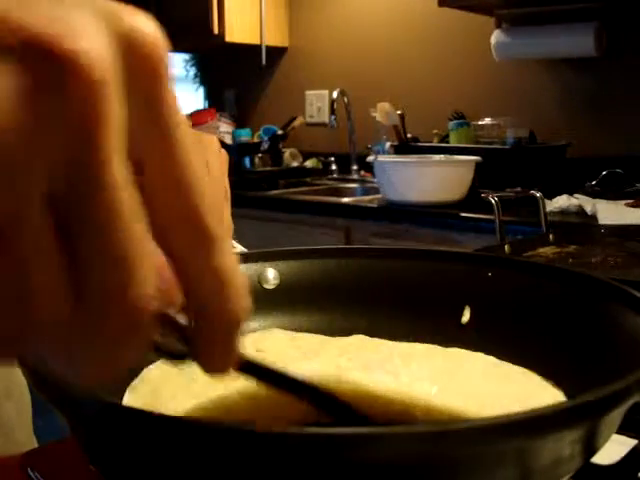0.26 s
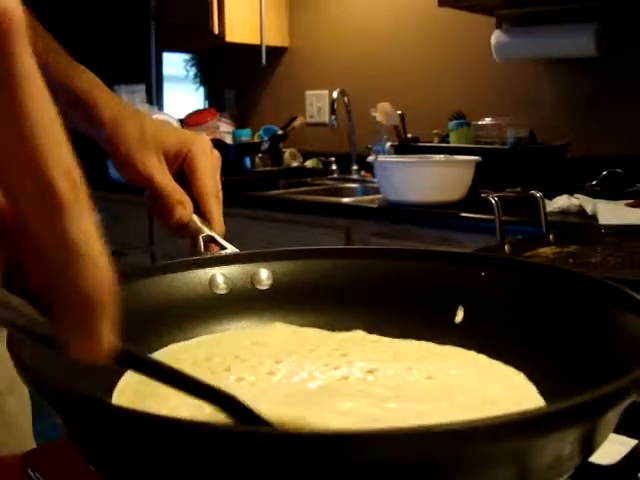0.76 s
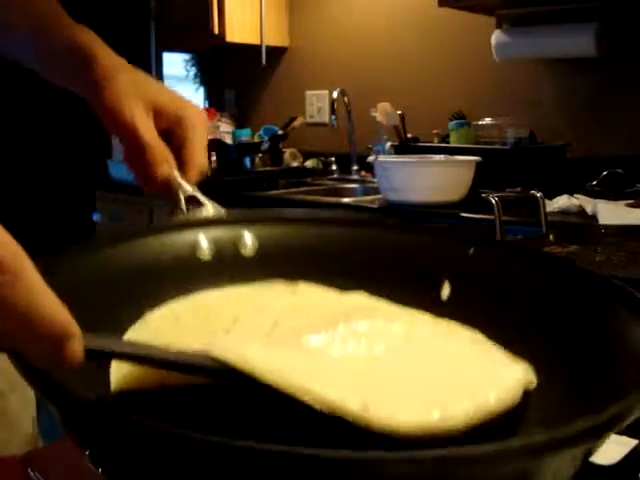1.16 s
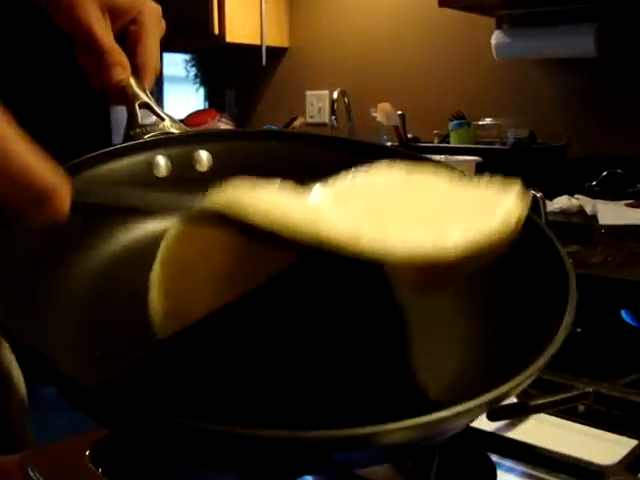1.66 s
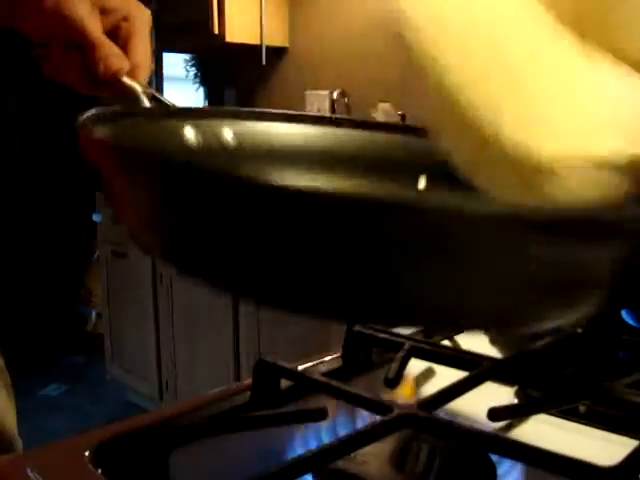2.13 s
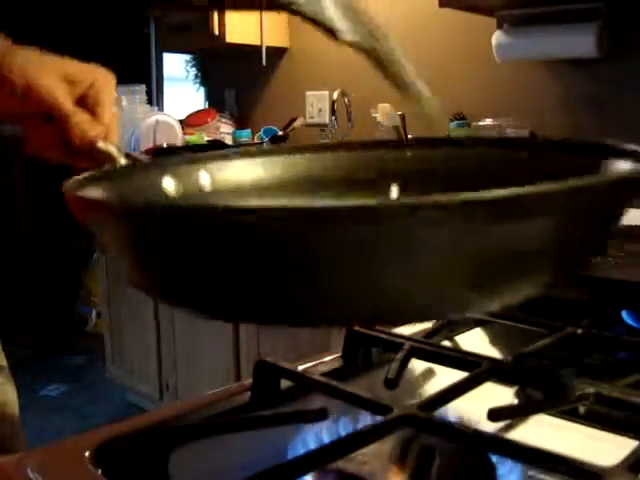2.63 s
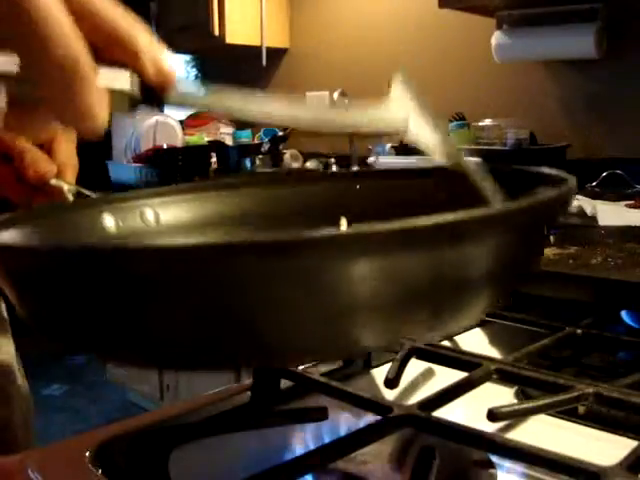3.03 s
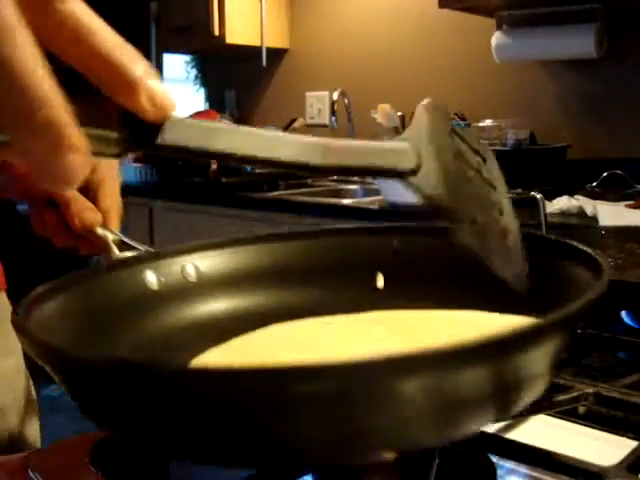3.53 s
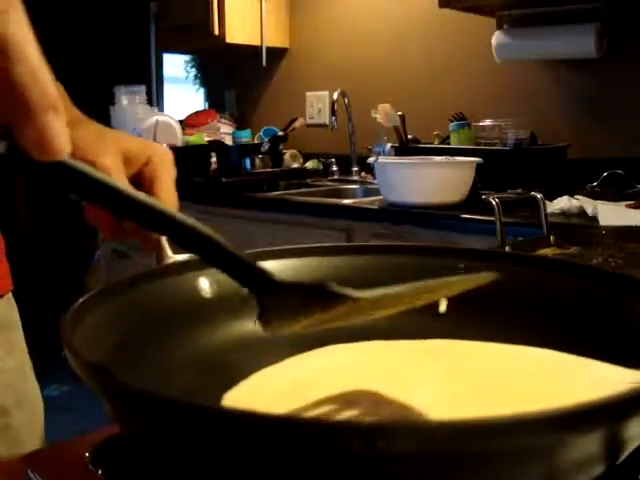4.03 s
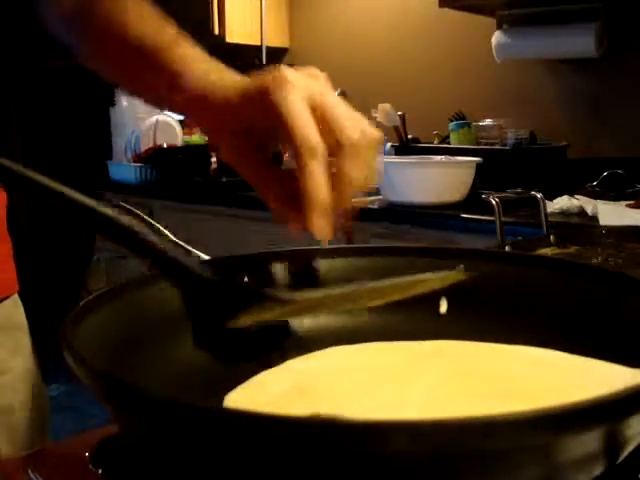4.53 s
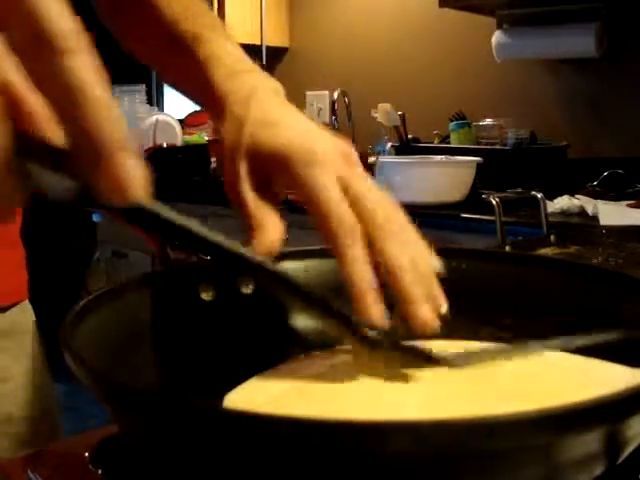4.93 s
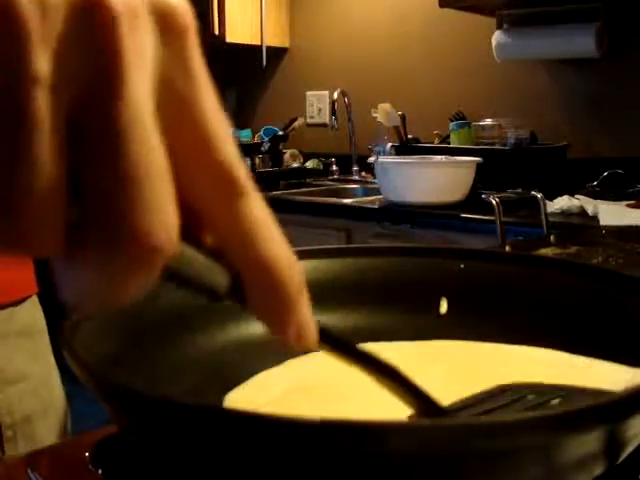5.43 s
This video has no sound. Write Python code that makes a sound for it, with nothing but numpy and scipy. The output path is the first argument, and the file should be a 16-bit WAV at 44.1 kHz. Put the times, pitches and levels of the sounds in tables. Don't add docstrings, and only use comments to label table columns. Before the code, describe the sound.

A steady, broad hiss of gas flame and extractor fan runs throughout, with faint low thumps from the camera's electrics. From 0 to 1.1 s a plastic spatula makes quiet scuffs, small knocks and faint pings under a pancake, ending in a firmer scrape. At about 1.2 s the pan rocks, then drags off its iron grate until 1.7 s, with a wavering mid-pitched metallic groan and hard knocks near 1.57 s that leave a brief ring. The uncovered burner hisses slightly more around 2 to 3 s. The soft pancake slaps flat at 2.35 s; the rim gets a light tap at 3.01 s. At 3.72 s the pan lands with a loud clank, slides and rattles, bounces at 4.03 s and settles by 4.3 s. Then mostly hiss, with a small spatula tick and rub at 5.35 s. Short echoes, limited treble and clipped blows.

```python
import sys
import numpy as np
from scipy import signal
from scipy.io import wavfile
from scipy.ndimage import uniform_filter1d

SR = 44100
rng = np.random.default_rng(int(sys.argv[2]) if len(sys.argv) > 2 else 0)


def gain_from_db(level_db):
    decades = np.asarray(level_db, float) / 20
    return 10 ** decades


def transcribe(u):
    v = np.clip(np.atleast_2d(u).T, -1, 1)
    q = np.round(v * 32767).astype(np.int16)
    wavfile.write(sys.argv[1], SR, q)


N = 250485

# (frequency [Hz], level [dB])
HISS_COLOUR = [(40, -22.5), (100, -16), (200, -31.5), (350, -13), (600, -2), (1000, -13), (1800, -16),
               (2700, -11), (3300, -17.5), (6000, -23.5), (9800, -28), (11000, -26.5)]
# (frequency [Hz], width [Hz], level [dB])
HISS_BANDS = [(244.2, 21.3, 14.0), (455, 80, 1.5), (1616, 44, -8.5), (2880, 85, -6.5), (3950, 140, -9),
              (4290, 46, -11.5), (8500, 90, -22), (138, 59, 2.0), (670, 32, -22.0)]
# (time [s], level [dB])
HISS_SWELL = [
    (0, 0.5),
    (1, 0.5),
    (2.099, 0),
    (2.8, 1),
    (3.499, 0),
    (4.6, 0),
    (5.68, 0),
]
# (time [s], level [dB])
JETS_OPEN = [
    (0, -4.5),
    (1.7, -3),
    (2.2, 3.5),
    (2.8, 4.5),
    (3.15, -3.5),
    (4.5, -7.5),
    (5.68, -8.5),
]
# (frequency [Hz], time to fall 60 dB [s])
KITCHEN_FADE = [(120, 0.86), (330, 0.53), (870, 0.32), (2300, 0.38), (6060, 0.31)]
JOLTS = [.07, .805, 1.595, 2.6, 3.072, 3.972, 4.872, 5.5]
SMALL_JOLTS = [.765, 2.565, 5.462]
# (time [s], length [s], lowest frequency lost [Hz])
DROPOUTS = [(0.41, 0.003, 4950), (0.494, 0.0032, 4700), (0.553, 0.0038, 4430), (1.031, 0.0087, 3200),
            (1.245, 0.021, 4400), (1.924, 0.011, 4000), (2.028, 0.009, 5300), (2.294, 0.0084, 5450),
            (2.329, 0.021, 3200), (2.336, 0.0033, 1002), (2.388, 0.01, 7000), (3.055, 0.02, 5100),
            (5.365, .012, 5200), (3.693, 0.025, 900), (3.752, 0.007, 4900), (3.758, 0.009, 4700),
            (3.811, 0.0071, 5100), (3.974, 0.0063, 5960), (3.849, 0.0072, 5960), (4.022, .006, 4000),
            (4.041, 0.016, 6600), (4.193, 0.01, 3500), (4.259, 0.015, 5400)]

# (frequency [Hz], level [dB])
SPATULA = [(785, 33, 6.5), (3100, 280, -2), (3500, 63, -2), (3690, 60, 0.5), (4560, 19, -20),
           (5440, 110, -26), (7000, 22, -28), (7750, 83, -16)]
SPATULA_DENSE = [(59, -23), (100, -23.5), (139, 7), (329, -28), (781, 3), (2720, -13.5), (5640, -6),
                 (9850, -13.5), (12800, -50), (21700, -120)]
BATTER = [(666, 30, 7), (1130, 230, -3), (1990, 230, -10), (3610, 800, -3.5), (6380, 320, -9),
          (8400, 470, -15.5)]
BATTER_DENSE = [(60, -46), (240, -14.5), (700, -1.5), (1200, -7), (2200, -15), (3600, -8), (9600, -12),
                (12000, -10)]
GRATE = [(157, 30, -9), (243, 17.5, -1), (368, 17, -13), (460, 7.6, -3.5), (647, 24, 5), (792, 51, 1.5),
         (1350, 96, -7.5), (1620, 42, -7), (2010, 210, -15), (2500, 160, -27), (3040, 320, -20),
         (4270, 2900, -35.5)]
GRATE_DENSE = [(60, -71), (200, -16.5), (600, -1.5), (1400, -13), (2700, -42.5), (5500, -33.5),
               (9600, -46.5), (12000, -76.5)]
PAN_LOW = [(150, 15, -5), (668, 22, 27.5), (890, 20, -4), (930, 39, 11)]
PAN_DENSE = [(60, -69), (200, -34), (500, -5.5), (1200, -2.5), (2700, -24), (5000, -18), (9600, -27),
             (12000, -41.5)]
# (frequency [Hz], width [Hz], level [dB])
RIM = [(515, 60, 0), (1160, 60, -8), (1637, 40, -8), (3000, 90, -24)]
EDGE = [(1500, 300, -12), (250, 30, -2), (3950, 25, -7), (2550, 25, -1), (2000, 200, -12), (3100, 40, -5)]
# (width [Hz], level [dB])
PAN_HZ = [1272, 1650, 2003, 2391, 2990, 3310, 3330, 3740, 4180, 4335, 4655, 4985, 5640, 5810, 5845, 6760,
          7250, 7600, 7745, 8000, 8657, 9700]
PAN_RING = [(14, -22), (40, 0.5), (15.9, -2), (16, -9.5), (22, 0.5), (28, 2.5), (20.4, -9), (35, -12),
            (40, -8), (25, -13), (26, 0), (35, -18), (60, -6.5), (25, -3.5), (25, -7.5), (60, -10.5),
            (35, -16), (30, -20), (20, -12.5), (60, -14), (20, -23), (50, -18)]
# (frequency [Hz], width [Hz], level [dB])
GRIPS = [
    [(3030, 58, -15), (1623, 42, 0.5)],
    [(3050, 66, -4), (2480, 110, -4)],
    [(3410, 81, -11.5), (5570, 95, -16)],
    [(3310, 140, -32), (5580, 160, -23)],
    [(3500, 680, 0), (5300, 270, -31)],
]

# (time [s], length [s], peak pressure [dB], sliding speed as middle band over low ring [dB],
# place of the peak [0-1])
NUDGES = [
    (0.024, 0.35, -36.5, -8.5, 0.32),
    (0.384, 0.044, -33.5, -11.5, 0.18),
    (0.469, 0.19, -36, -11.5, 0.4),
    (0.632, 0.15, -37.5, -6, 0.19),
    (0.698, 0.046, -34.5, -16, 0.2),
    (0.78, 0.12, -36.5, -9.5, 0.32),
    (0.9, 0.38, -44.5, -7, 0.06),
]
SCRAPE = [
    (1.025, 0.12, -28.5, -5, 0.37),
    (1.131, 0.08, -24.5, -14.5, 0.57),
]
FLIP = [
    (1.741, 0.15, -37.5, -10, 0.087),
    (1.839, 0.078, -48.5, 7, 0.97),
    (2.17, 0.12, -42.5, -2.5, 0.97),
    (2.285, 0.045, -35, -2.5, 0.81),
    (2.385, 0.099, -37, 2, 0.13),
    (3.05, 0.12, -48, 2.5, 0.1),
    (3.16, 0.037, -40.5, -4.5, 0.18),
    (5.352, 0.06, -39, -9, 0.1),
    (5.44, 0.091, -40.5, -7, 0.59),
]
SETTLE = [
    (3.735, 0.17, -14, -16, 0.16),
    (3.81, 0.13, -15, -12, 0.12),
    (3.88, 0.26, -20.5, -6.5, 0.022),
    (4.035, 0.19, -16, -13.5, 0.071),
    (4.215, 0.14, -18.5, -32, 0.3),
]
# (time [s], pressure [dB], sliding speed [dB])
DRAG = [
    (1.255, -26, -15),
    (1.287, -19, -6),
    (1.309, -18, -8),
    (1.36, -19, -3.5),
    (1.44, -19, 0),
    (1.487, -18.5, -0.5),
    (1.575, -12, -8.5),
    (1.62, -18, -4),
    (1.694, -21.5, -12),
    (1.74, -40, -16),
]
# (time [s], frequency [Hz], level [dB])
BOWED = [
    (1.262, 668, -41),
    (1.312, 668, -20),
    (1.385, 665.2, -22.5),
    (1.43, 678, -22.5),
    (1.49, 682, -30),
    (1.52, 671.4, -17),
    (1.575, 667.5, -13),
    (1.69, 676, -19),
    (1.715, 676, -38),
]

# (time [s], peak level [dB], treble against low ring [dB], chatter time [s],
# mode nearest the blow [Hz])
KNOCKS = [
    (0.389, -28, -6, 0.006, 1335),
    (0.421, -30, -31, 0.049, 1350),
    (0.708, -26.5, -21, 0.0056, 1254),
    (1.231, -14.5, -24.5, 0.0088, 1165),
    (1.566, -4, -8.5, 0.039, 1660),
    (1.599, -8.5, -22, 0.0071, 2000),
]
PINGS = [
    (0.511, -35, -21, 0.0087, 1370),
    (0.647, -37, -13, 0.011, 2070),
    (1.058, -33.5, -19, 0.011, 1110),
    (1.14, -24, -25, 0.018, 1940),
]
ROCKS = [
    (1.168, -14.5, -16, 0.01, 645),
    (1.197, -23, -16, 0.02, 668),
    (1.232, -21, -20, .012, 681),
]
SCRATCH = [
    (.523, -41, 0, .015, 4900),
    (.529, -40, 0, .015, 4400),
    (.527, -43, 0, .015, 5250),
    (3.075, -45, 10, .02, 5300),
]
SLAPS = [
    (2.346, -22.5, -8, 0.05, 705),
    (2.349, -4.5, -7, 0.1, 1109),
    (2.3665, -16, 9, 0.075, 3450),
    (2.372, -13.5, 4, 0.036, 1960),
]
RIM_TAP = [
    (3.0135, -19.5, -17, 0.006, 560),
]
EDGE_TAP = [
    (5.35, -27, -2, .004, 1645),
]
LANDINGS = [
    (3.721, -2, -7, 0.082, 3005),
    (3.732, -7, -1, 0.034, 1610),
    (4.029, -8.5, -2, 0.081, 2050),
    (4.045, -33, -32, 0.035, 590),
    (4.213, -8.5, -8, 0.18, 3500),
    (4.227, -6, -13, 0.031, 1050),
]
BUMPS = [
    (3.808, -9, -22, 0.036, 826),
    (3.874, -13, -17, 0.071, 1350),
    (3.897, -15, -2.5, 0.045, 817),
    (4.013, -12, -9, 0.22, 860),
    (4.097, -14, -11, 0.021, 1266),
    (4.175, -15, -22, 0.14, 700),
    (4.206, -12.5, -12, 0.053, 806),
    (4.257, -15, -44.5, 0.026, 687),
]
# (time [s], length [s], frequency [Hz], width [Hz], level [dB])
SINGS = [(1.296, 0.15, 2390, 14, -29), (1.349, 0.14, 1257, 14, -28), (1.403, 0.061, 893, 45, -21.5),
         (1.41, 0.054, 5840, 30, -24), (1.443, 0.049, 5180, 37, -28), (1.449, 0.12, 4840, 29, -28),
         (1.50, 0.069, 7450, 40, -26.5), (1.576, 0.054, 680, 63, -16.5), (1.604, 0.07, 5705, 34, -30),
         (1.62, 0.08, 4180, 20, -31), (1.56, 0.063, 910, 40, -25.5), (1.645, 0.014, 1996, 8.2, -27.5),
         (1.6, 0.031, 160, 15, -30.5), (1.5, .1, 149, 18, -42), (1.595, 0.023, 685, 30, -16),
         (3.722, 0.03, 616, 44, -14.5), (3.727, .06, 1100, 60, -25), (3.75, 0.063, 950, 60, -26),
         (3.809, .03, 2000, 50, -42), (3.836, 0.045, 3400, 40, -32), (3.848, 0.059, 790, 44, -23),
         (3.868, 0.029, 1347, 53, -17.5), (3.895, 0.05, 3480, 60, -29.5), (3.921, 0.086, 1375, 45, -33.5),
         (3.97, .03, 2300, 40, -33.5), (4.035, 0.02, 1644, 50, -19), (4.045, 0.04, 657, 33, -19.5),
         (4.057, 0.063, 4651, 40, -40), (4.054, 0.091, 5500, 40, -38), (4.21, .04, 810, 63, -20),
         (4.21, 0.016, 1386, 55, -19), (1.33, .19, 2992, 11, -25), (1.277, .2, 3324, 40, -30),
         (4.223, 0.051, 760, 90, -25), (2.35, 0.035, 244, 34, -34)]
CLACKS = [(1.5855, -9), (1.6185, -10), (3.7225, -5), (3.7435, -9), (3.7695, -9), (3.8118, -5), (3.8985, -7),
          (4.0395, -9), (4.0612, -7), (4.2163, -4), (4.2286, -8), (4.2402, -2), (4.2443, -8), (4.2608, -5)]
PULLS = [
    (1.6014, -6),
    (1.6482, -7),
    (3.9529, -13),
    (4.0443, -8),
]
# (frequency [Hz], level [dB], time to fall 60 dB [s])
FREE_RING = [(270, -17, 1.1), (371, -9, .9), (442, -2, .35), (620, -3, .3), (698, -8, 1.1), (735, 0, .3),
             (1215, -11, .7), (1320, -9.5, 1.05), (2006, 4, .45)]
RIM_RING = [(513, -25, .09), (1388, -23, .22), (1934, -28, .22), (2572, -37, .4), (1606, -36, .16)]
EDGE_RING = [(1640, -31, .14), (3600, -40, .25)]

PAN = PAN_LOW + [(hz, *ringing) for hz, ringing in zip(PAN_HZ, PAN_RING)]
DRAGGED_PAN = [(hz, width, db - 9 * (hz == 668)) for hz, width, db in PAN]


def evened(x):
    return x / np.sqrt(np.mean(x ** 2) + 1e-20)


def read(points, hz):
    f, value = np.transpose(points)
    return np.interp(np.log(hz + 1), np.log(f + 1), value)


def add(mix, s, sound):
    part = mix[round(s * SR):][:len(sound)]
    part += sound[:len(part)]


def supply_jolts():
    flutter_hz = 24.4
    t, volts = np.arange(N) / SR, np.zeros(N)
    for s in JOLTS:
        u = t - s
        flutter = (u > .18) & (u < .415)
        volts += (u > 0) & (u < .137)
        volts += flutter * (0.082 + 0.29 * ((flutter_hz * (u - .19)) % 1 < .3))
    for s in SMALL_JOLTS:
        volts += 0.27 * ((t > s) & (t < s + .018))
    volts = signal.lfilter(*signal.butter(1, 60, fs=SR), volts)
    return gain_from_db(-37) * signal.lfilter(*signal.butter(1, 5.5, "high", fs=SR), volts)


def flame_and_fan():
    level_db, jet_hz, jet_width_hz = -42, 2504, 130
    frames, hz = N // 256 + 5, np.fft.rfftfreq(1024, 1 / SR)
    a, b, patches = rng.standard_normal((frames, 513, 3)).T
    patches = evened(uniform_filter1d(uniform_filter1d(patches, 9, 0), 12, 1))
    bands = sum(gain_from_db(db) / np.sqrt(1 + (2 * (hz - f) / width) ** 4) for f, width, db in HISS_BANDS)
    colour = gain_from_db(read(HISS_COLOUR, hz) + 0.5) + 0.38 * bands
    t = np.arange(frames) * 256 / SR
    jet_band = 1 / np.sqrt(1 + (2 * (hz[:, None] - jet_hz) / jet_width_hz) ** 4)
    jets = gain_from_db(np.interp(t, *np.transpose(JETS_OPEN))) * jet_band
    swell_db = np.interp(t, *np.transpose(HISS_SWELL))
    z = (a + 1j * b) * (colour[:, None] + .38 * jets) * gain_from_db(1.57 * patches + swell_db)
    return gain_from_db(level_db) * evened(signal.istft(z, nperseg=1024, noverlap=768)[1][:N])


def kitchen(x):
    taps = np.zeros(SR // 2)
    at = np.arange(200, len(taps) - 20, 20)
    taps[at + rng.integers(0, 20, len(at))] = rng.choice([-1., 1.], len(at))
    hz, t, z = signal.stft(taps, SR, nperseg=256)
    fade = gain_from_db(-60 * t / read(KITCHEN_FADE, hz)[:, None])
    tail = signal.istft(z * fade, SR, nperseg=256)[1]
    return signal.fftconvolve(x, tail / np.linalg.norm(tail))[:N]


def body(peaks, dense, dense_db, shuffle_db=0):
    t = np.arange(8192) / SR
    log_gain = np.log(gain_from_db(read(dense, abs(np.fft.fftfreq(8192, 1 / SR))) + dense_db))
    ringing = np.fft.ifft(np.exp(np.conj(signal.hilbert(log_gain)))).real
    ringing[4096:] = 0
    places = rng.standard_normal(len(peaks))
    for (hz, width, db), place in zip(peaks, places):
        gain = gain_from_db(db + shuffle_db * place) * 2 * np.pi * width / SR
        ringing += gain * np.exp(-np.pi * width * t) * np.sin(2 * np.pi * hz * t)
    bands = (2000, "low"), ((2000, 5000), "band"), (5000, "high")
    parts = [signal.sosfilt(signal.butter(4, hz, kind, fs=SR, output="sos"), ringing) for hz, kind in bands]
    return [part / np.linalg.norm(part) for part in parts]


def grit(count, per_s, spread_db):
    hit, sign, size = rng.random(count), rng.standard_normal(count), rng.exponential(1, count)
    return evened((hit < per_s / SR) * sign * gain_from_db(spread_db * np.minimum(size, 4)))


def driven_body(force, levels_db, parts):
    return sum(signal.fftconvolve(force * gain_from_db(db), part) for db, part in zip(levels_db, parts))


def stroke(start, length, press_db, speed_db, peak, rise_db, fall_db, speedup_db):
    top = start + length * np.clip(peak, .02, .98)
    return [(start, press_db - rise_db, speed_db), (top, press_db, speed_db),
            (start + length, press_db - fall_db, speed_db + speedup_db)]


def slide(mix, rows, shape, per_s, spread_db, top_db, low_db=0):
    spot_s = .05
    s, press_db, speed_db = np.transpose(rows)
    t = np.arange(s[0], s[-1], 1 / SR)
    press = gain_from_db(np.interp(t, s, press_db)) * signal.windows.tukey(len(t), .04)
    middle_db = np.interp(t, s, speed_db)
    levels_db = low_db, middle_db, 1.61 * middle_db + top_db
    for spot in range(3):
        fade = np.sqrt(2 / 3) * np.cos(np.pi * (t / spot_s + spot) / 3)
        force = grit(SR // 2, per_s, spread_db)[:len(t)]
        add(mix, s[0], driven_body(force * press * fade, levels_db, body(*shape)))


def blows(mix, rows, shape, per_s, rise_s, near_t60, near_db, top_db):
    t = np.arange(6000) / SR
    for s, db, treble_db, chatter_s, hz in rows:
        parts, fade_db = body(*shape), -60 * t / max(chatter_s, .001)
        force = grit(6000, per_s, 0.92) * gain_from_db(fade_db) * np.minimum(t / rise_s, 1)
        force[20] += 0.0058 / rise_s
        peak = abs(signal.fftconvolve(force, parts[0])).max()
        levels_db = 0, treble_db, treble_db + top_db + 0.021 * fade_db
        add(mix, s, driven_body(force, levels_db, parts) * gain_from_db(db) / peak)
        near = gain_from_db(-60 * t / near_t60) * np.minimum(t / (0.72 * rise_s), 1) * np.sin(2 * np.pi * hz * t)
        add(mix, s, gain_from_db(db + near_db) * near)


def ring(mix, s, modes, gain_db):
    t = np.arange(SR) / SR
    free = sum(gain_from_db(db - 60 * t / t60) * np.sin(2 * np.pi * hz * t) for hz, db, t60 in modes)
    add(mix, s, gain_from_db(gain_db) * np.minimum(t / .002, 1) * free)


def singing_spots(mix):
    t = np.arange(4000) / SR
    for s, length, hz, width, db in SINGS:
        force = grit(8000, 3000, 4.2)[:round(length * SR)]
        mode = np.exp(-np.pi * width * t) * np.sin(2 * np.pi * hz * t)
        tone = signal.fftconvolve(force * np.hanning(len(force)) ** 0.49, mode)
        add(mix, s, gain_from_db(db) * tone / np.sqrt(np.mean(tone[:len(force)] ** 2)))


def taps(mix, tones):
    blows(mix, RIM_TAP, (RIM, BATTER_DENSE, -19),
          per_s=12000, rise_s=0.002, near_t60=0.06, near_db=3, top_db=-22)
    blows(mix, EDGE_TAP, (EDGE, BATTER_DENSE, -15),
          per_s=8000, rise_s=.0012, near_t60=.03, near_db=-14, top_db=-14)
    ring(tones, 3.0145, RIM_RING, 0)
    ring(tones, 5.351, EDGE_RING, 0)


def spatula_strokes(mix):
    for row in NUDGES:
        rows = stroke(*row, rise_db=10.5, fall_db=24.5, speedup_db=-3.0)
        slide(mix, rows, (SPATULA, SPATULA_DENSE, -1, 3), per_s=8300, spread_db=4.0, top_db=5.5)
    for row in SCRAPE:
        rows = stroke(*row, rise_db=11.5, fall_db=7.0, speedup_db=0.5)
        slide(mix, rows, (SPATULA, SPATULA_DENSE, -1.5, 3), per_s=9600, spread_db=0.0, top_db=0.5)


def spatula_scratches(mix):
    blows(mix, SCRATCH, (SPATULA, SPATULA_DENSE, 1.5),
          per_s=17000, rise_s=0.0034, near_t60=0.03, near_db=13, top_db=-4)


def pancake_rubs(mix):
    for row in FLIP:
        rows = stroke(*row, rise_db=14.5, fall_db=20.0, speedup_db=4.0)
        slide(mix, rows, (BATTER, BATTER_DENSE, 5, 3), per_s=7500, spread_db=-5.0, top_db=4.5)


def pancake_slap(mix):
    blows(mix, SLAPS, (BATTER, BATTER_DENSE, 1.5, 3),
          per_s=10000, rise_s=0.00083, near_t60=0.061, near_db=-3.5, top_db=3.0)


def bowed_pan(tones):
    wobble_db, wobble_s = 3.5, 0.0074
    s, hz, db = np.transpose(BOWED)
    t = np.arange(s[0], s[-1], 1 / SR)
    width = max(round(wobble_s * SR), 1)
    noise = rng.standard_normal(SR // 2 + 2000)
    wobble = evened(uniform_filter1d(uniform_filter1d(noise, width), width))[:len(t)]
    tone = np.sqrt(2) * np.sin(2 * np.pi * np.cumsum(np.interp(t, s, hz)) / SR)
    add(tones, s[0], gain_from_db(np.interp(t, s, db) + wobble_db * wobble) * tone)


def dragged_pan(mix, tones):
    slide(mix, DRAG, (DRAGGED_PAN, PAN_DENSE, 1.5, 2.5), per_s=6000, spread_db=2.5, top_db=-1.5, low_db=-4)
    bowed_pan(tones)
    ring(tones, 1.57, FREE_RING, -18.5)


def pan_knocks(mix):
    blows(mix, KNOCKS, (DRAGGED_PAN, PAN_DENSE, 3, 2),
          per_s=5400, rise_s=0.0015, near_t60=0.05, near_db=-4.0, top_db=-3.0)
    blows(mix, PINGS, (PAN, PAN_DENSE, 1.5, 3),
          per_s=5600, rise_s=0.0022, near_t60=0.13, near_db=2.0, top_db=-5.5)
    blows(mix, ROCKS, (PAN_LOW, PAN_DENSE, -10.5),
          per_s=9000, rise_s=0.006, near_t60=0.065, near_db=12, top_db=-16)


def slides_on_grate(mix):
    for row, grip in zip(SETTLE, GRIPS):
        rows = stroke(*row, rise_db=-3, fall_db=19.5, speedup_db=9.5)
        slide(mix, rows, (GRATE + grip, GRATE_DENSE, 4, 2.5), per_s=6000, spread_db=2.0, top_db=1.0)


def landings(mix):
    blows(mix, LANDINGS, (GRATE, GRATE_DENSE, 4, 2),
          per_s=7000, rise_s=0.0018, near_t60=0.035, near_db=-6, top_db=-7)
    blows(mix, BUMPS, (GRATE, GRATE_DENSE, 4, 2),
          per_s=7000, rise_s=0.006, near_t60=0.054, near_db=1.0, top_db=-27.0)


def clacks(mix):
    clack_s = 0.00021
    u = np.arange(-44, 45) / SR / clack_s
    for rows, way in (CLACKS, 1), (PULLS, -1):
        for s, db in rows:
            add(mix, s - 44 / SR, way * gain_from_db(db) * (1 - u ** 2) * np.exp(-u ** 2 / 2))


def pan_and_spatula():
    mix, tones = np.zeros((2, N))
    spatula_strokes(mix)
    dragged_pan(mix, tones)
    pancake_rubs(mix)
    slides_on_grate(mix)
    pan_knocks(mix)
    spatula_scratches(mix)
    landings(mix)
    pancake_slap(mix)
    taps(mix, tones)
    singing_spots(mix)
    clacks(mix)
    no_bass = signal.butter(6, 135, "high", fs=SR, output="sos")
    return signal.sosfilt(no_bass, mix), tones


def scene():
    near, tones = pan_and_spatula()
    room = kitchen(near + gain_from_db(-9) * tones)
    return np.tile(gain_from_db(-2.5) * (near + tones) + gain_from_db(-11.5) * room + flame_and_fan(), (2, 1))


def camera_losses(x):
    hz, t, z = signal.stft(x, SR, nperseg=256, noverlap=192)
    chance = rng.random((len(t) // 8 + 1, 33)).T
    chance = np.repeat(np.repeat(chance, 4, axis=0), 8, axis=1)[:len(hz), :len(t)]
    lost = (chance < .035) & (hz[:, None] > 4500)
    for s, length, low_hz in DROPOUTS:
        lost |= (hz[:, None] > low_hz) & (t > s) & (t < s + length) & (chance < .96)
    x = signal.istft(z * np.where(lost, gain_from_db(-33), 1), SR, nperseg=256, noverlap=192)[1][:, :N]
    top_cut = signal.firwin(1023, 9973 + 60, window=("kaiser", 10), fs=SR)
    return signal.oaconvolve(x, top_cut[None], "same")


def band_limit(x):
    return signal.sosfilt(signal.butter(12, 15800, fs=SR, output="sos"), x)


def record(dry):
    preamp_top, full_scale = .73, .70
    thump = signal.lfilter(*signal.butter(2, [15, 120], "band", fs=SR), dry ** 2)
    x = dry + .08 * thump + supply_jolts()
    x = x / (1 + (x / preamp_top) ** 8) ** (1 / 8)
    mix = np.clip(camera_losses(x), -full_scale, full_scale)
    return band_limit(mix)


dry = scene()
out = record(dry)
transcribe(out)
```